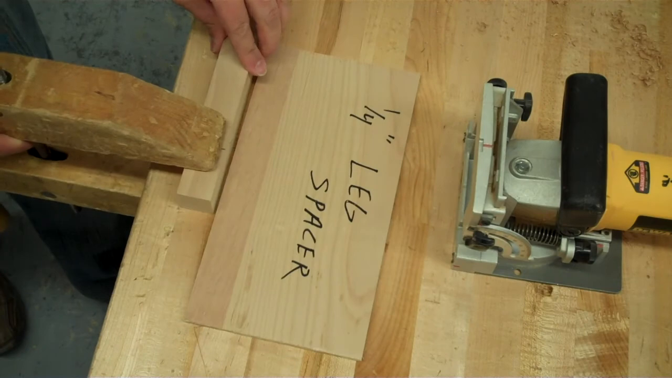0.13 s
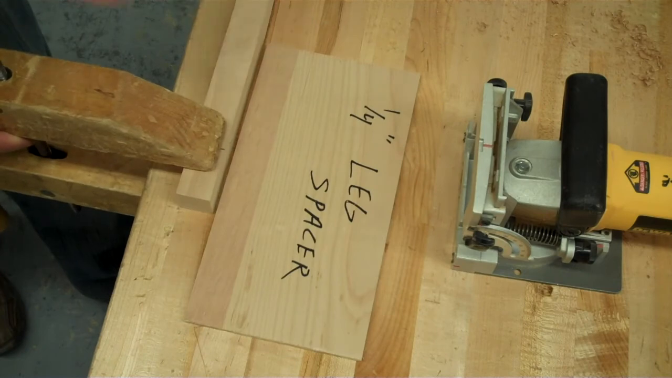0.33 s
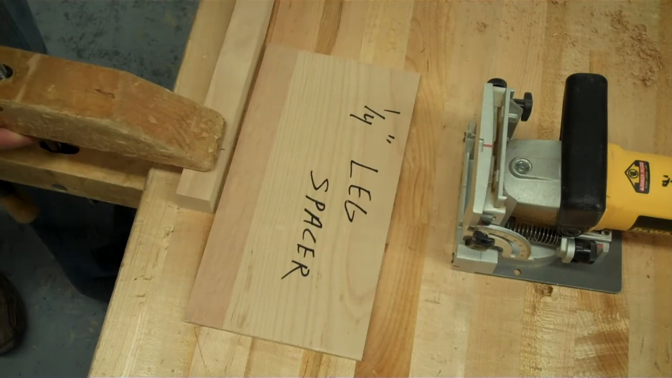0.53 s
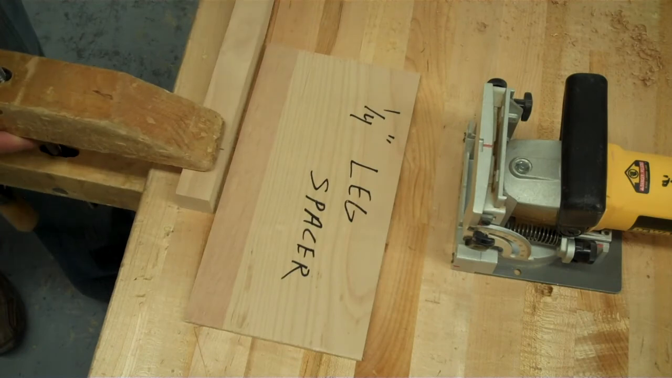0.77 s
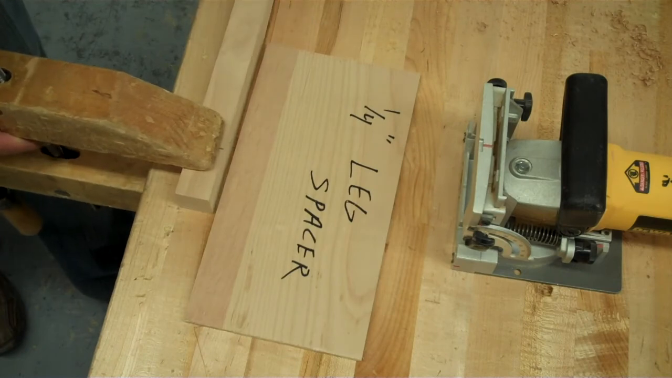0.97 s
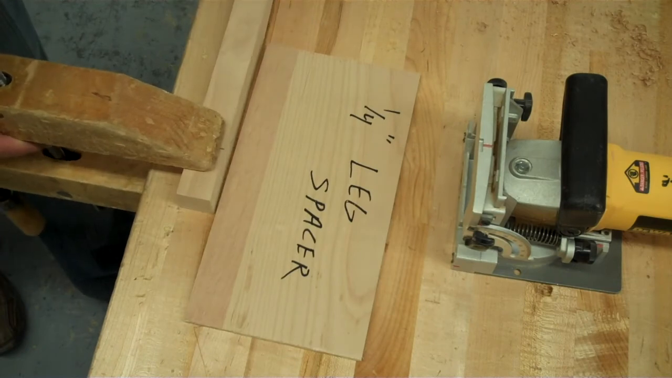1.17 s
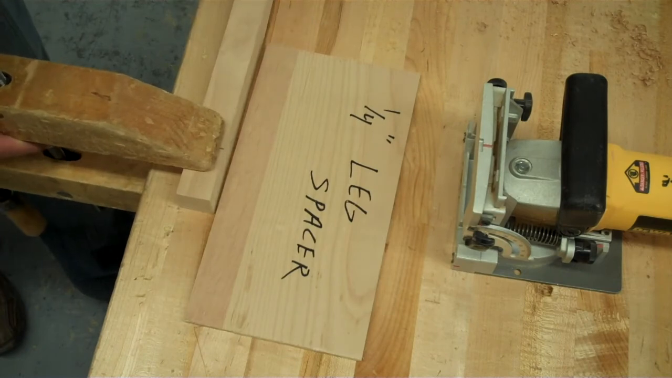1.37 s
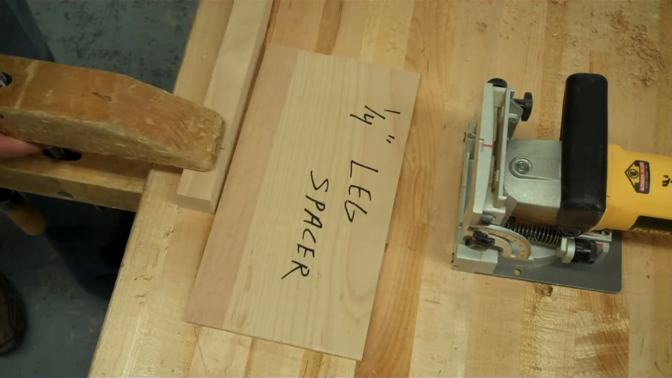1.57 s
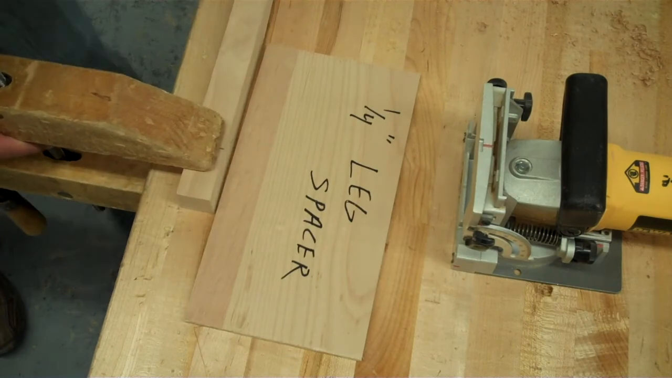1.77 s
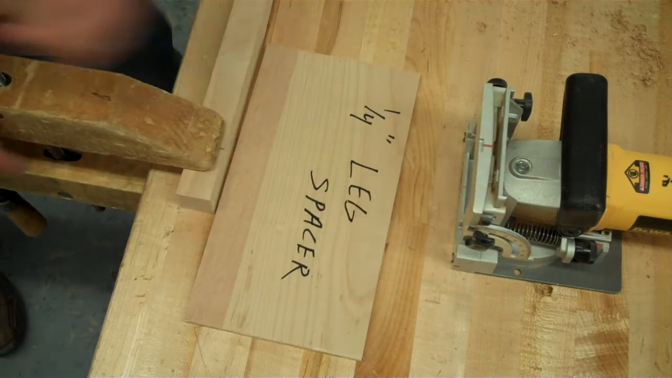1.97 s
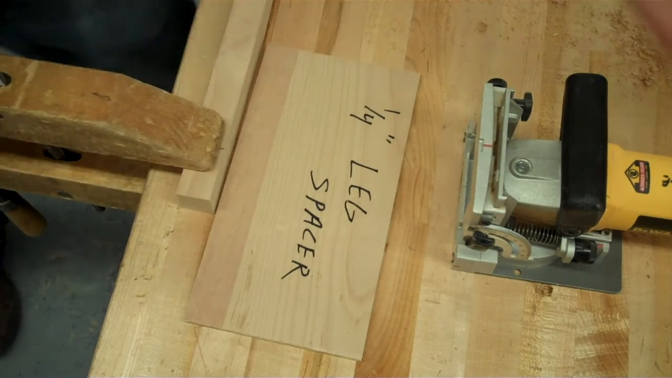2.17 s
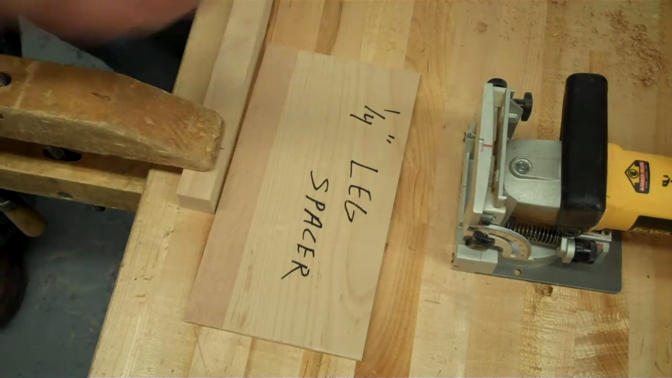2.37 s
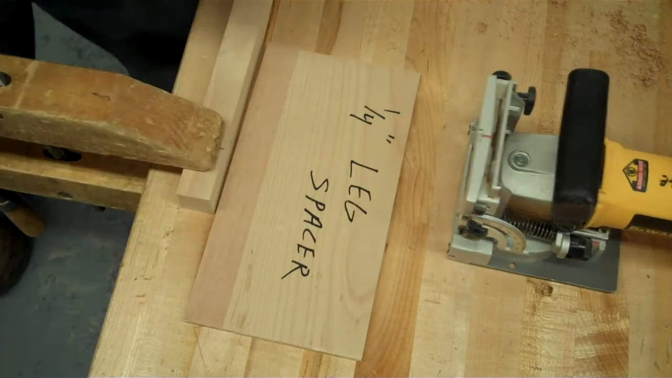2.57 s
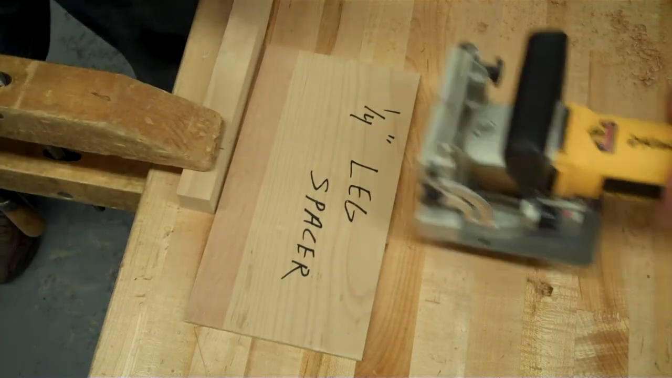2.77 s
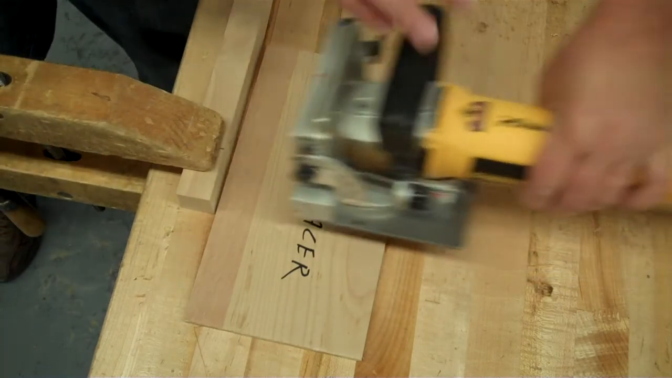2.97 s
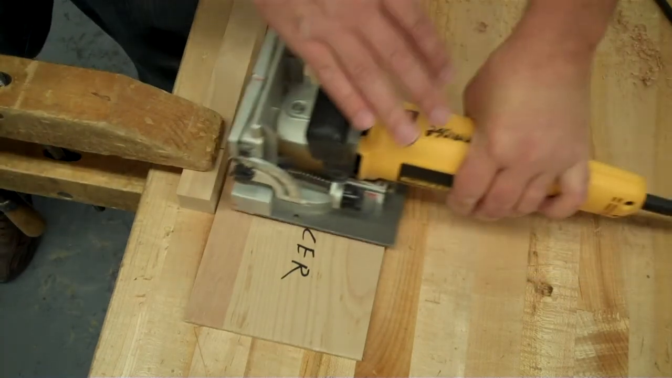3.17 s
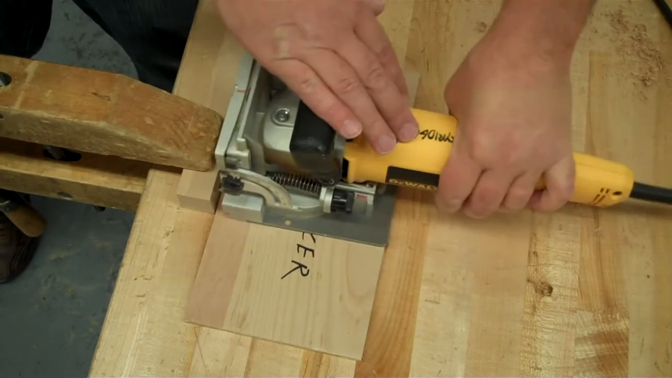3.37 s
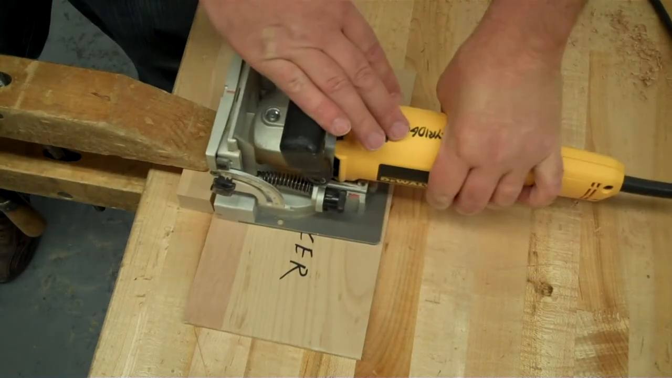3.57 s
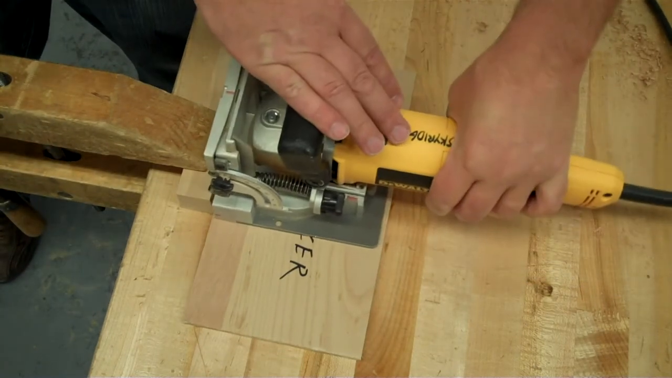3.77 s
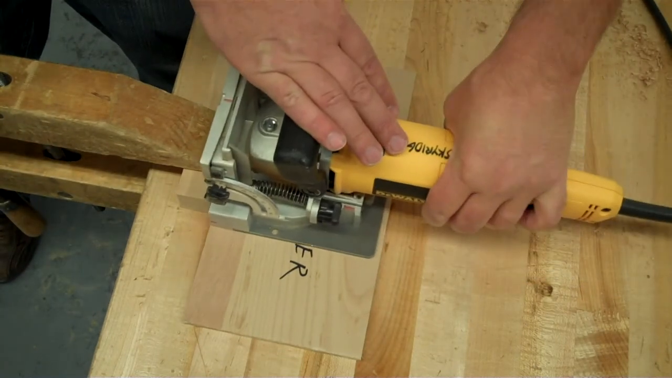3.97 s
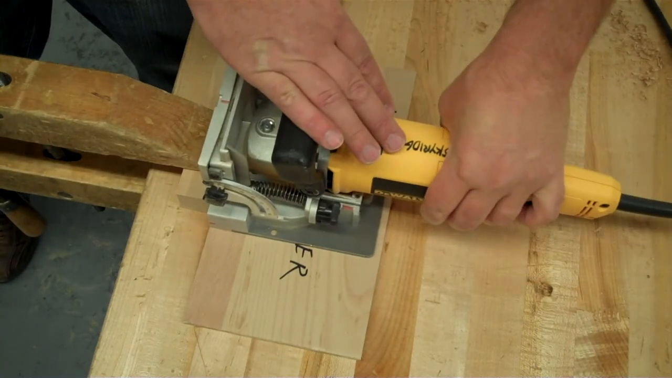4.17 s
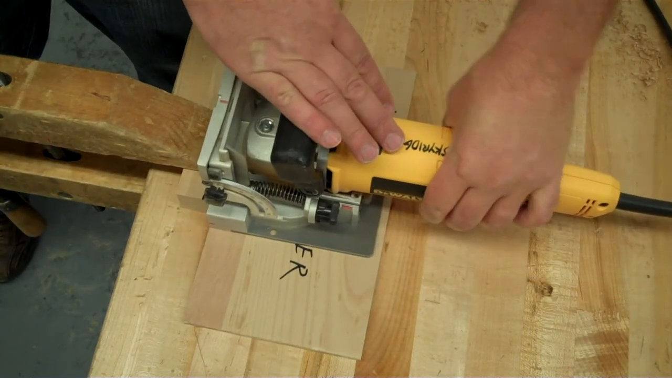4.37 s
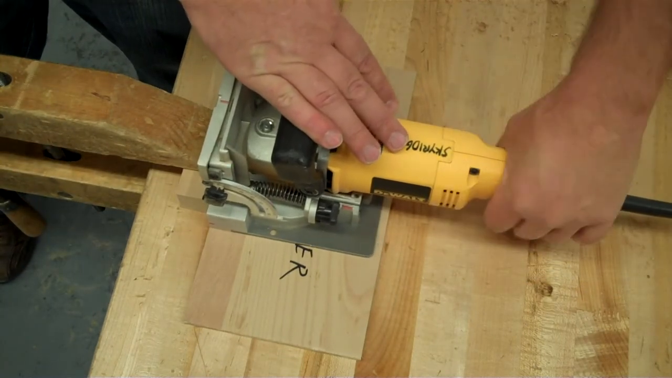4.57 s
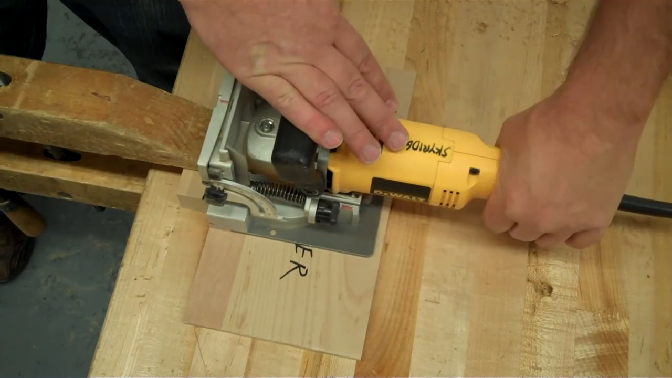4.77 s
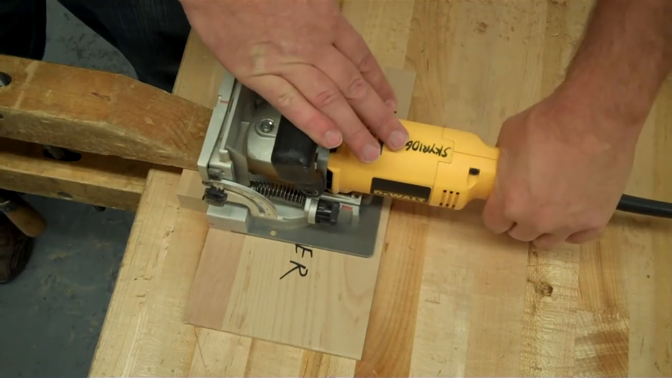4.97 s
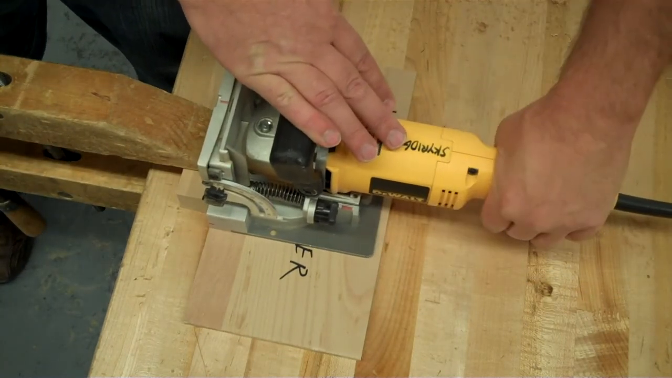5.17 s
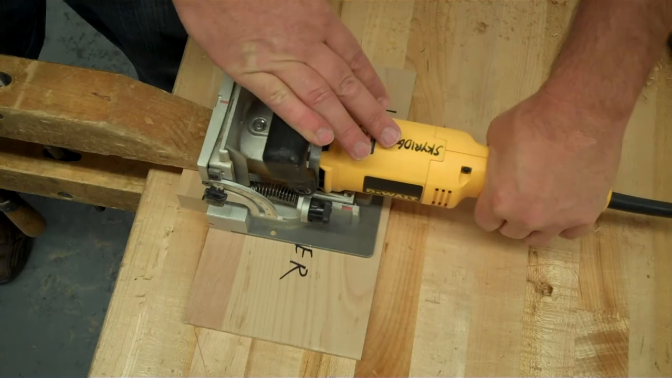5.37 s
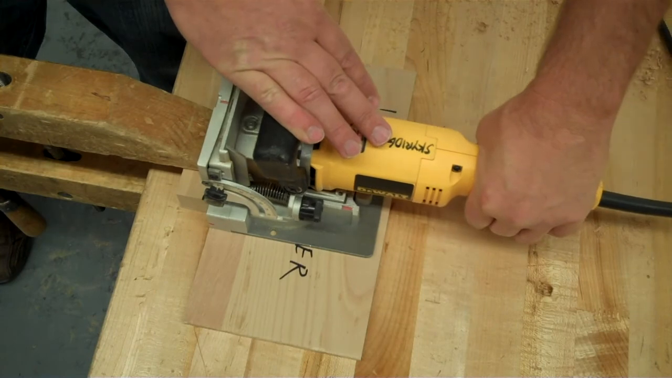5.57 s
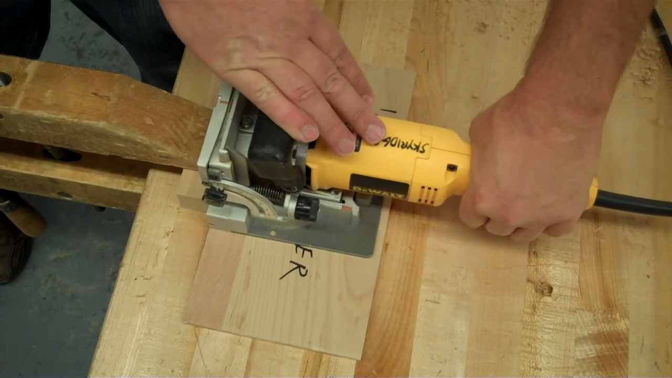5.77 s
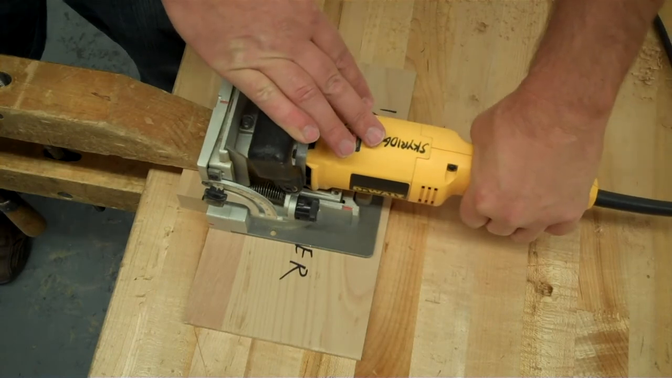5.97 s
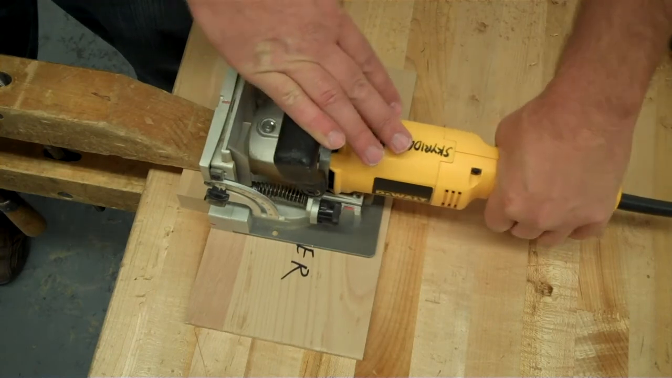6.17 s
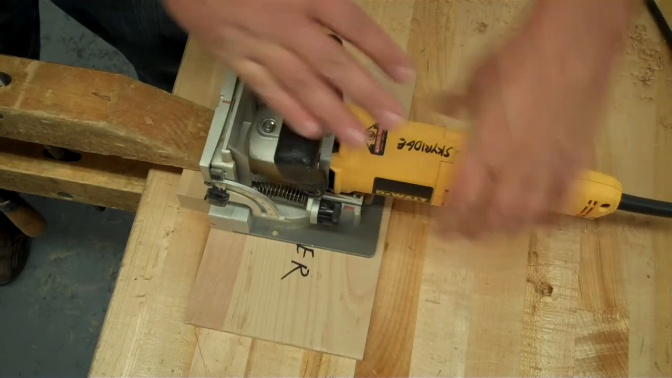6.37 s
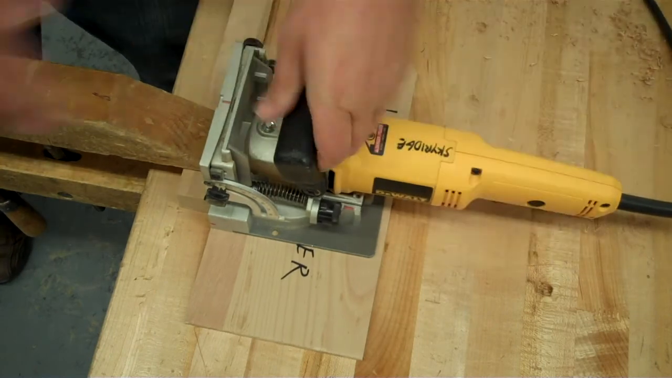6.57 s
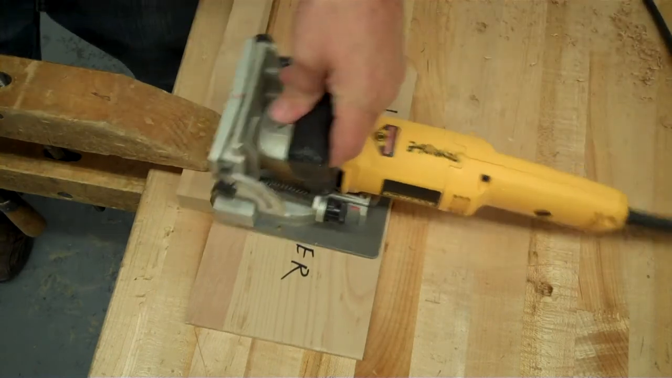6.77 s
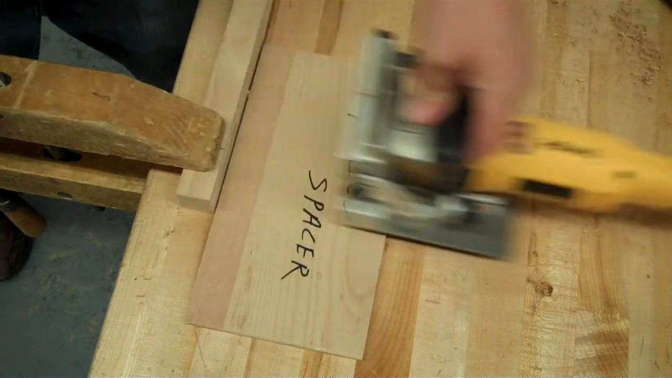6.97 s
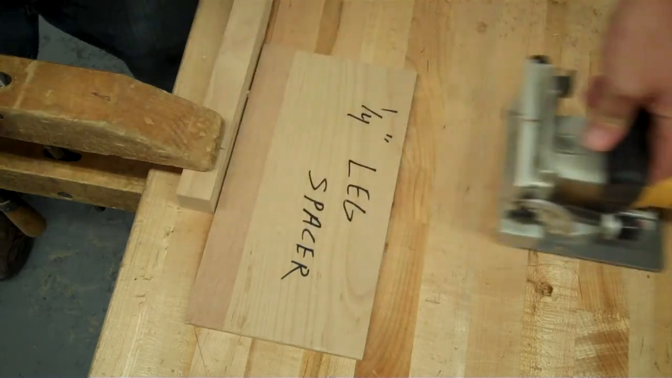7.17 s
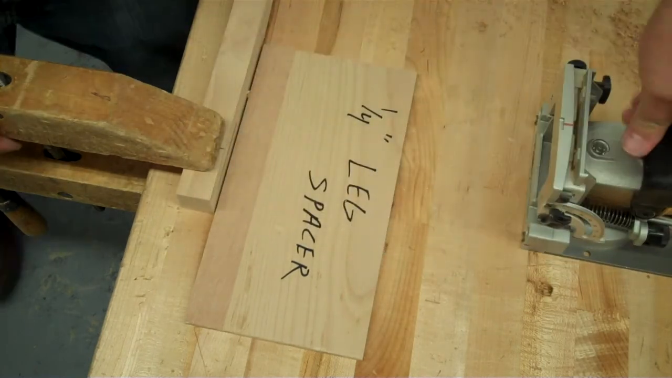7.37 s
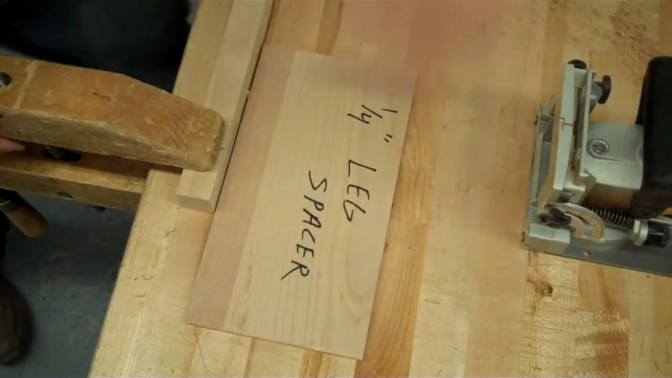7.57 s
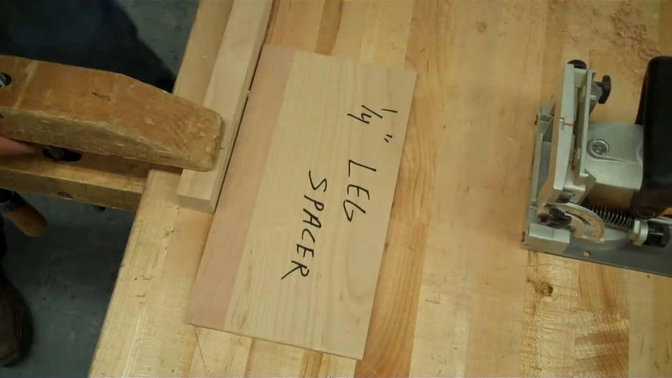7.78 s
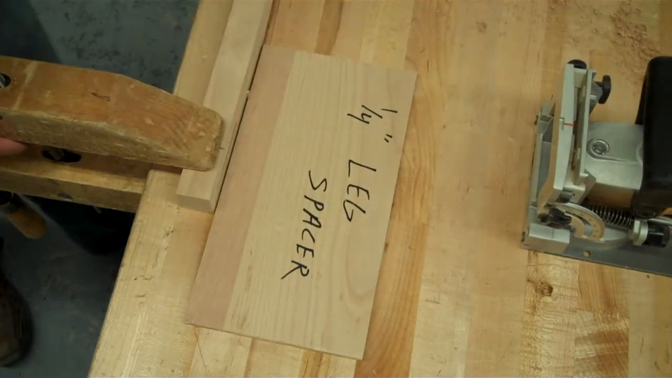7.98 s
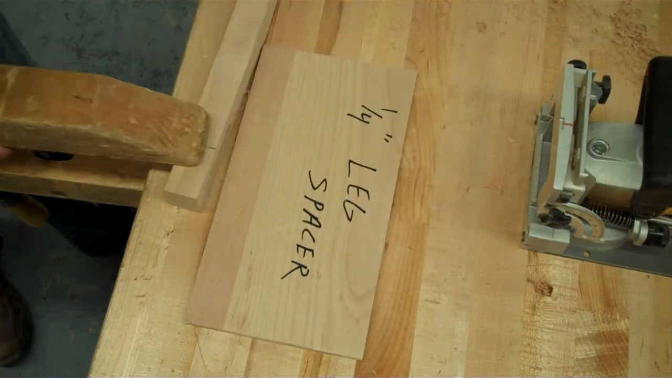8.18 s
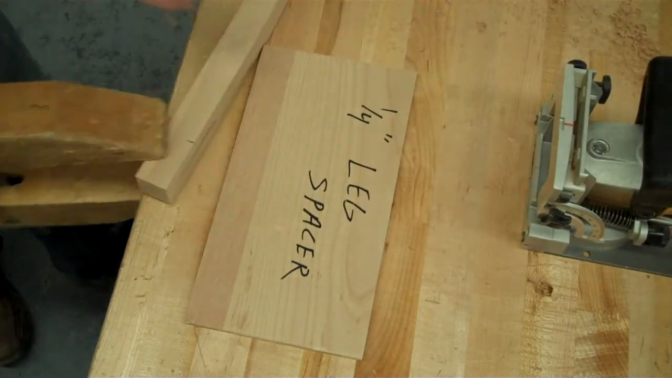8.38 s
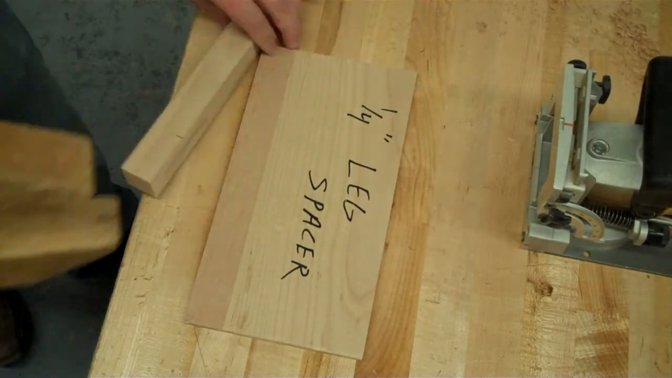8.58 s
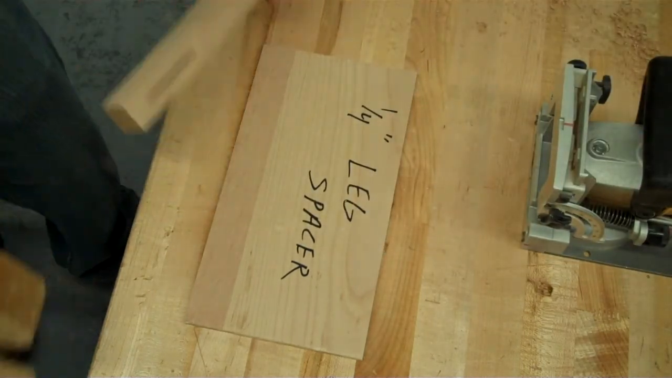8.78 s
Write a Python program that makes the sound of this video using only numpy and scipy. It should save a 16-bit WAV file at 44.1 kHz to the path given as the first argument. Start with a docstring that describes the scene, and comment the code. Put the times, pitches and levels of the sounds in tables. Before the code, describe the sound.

Quiet workshop hum with hand brushing and taps, then a loud slot cutter roars briefly into wood, spins down clattering and is set down.

```python
"""Hands and clamp rustle and knock on a workshop bench, then a small slot-cutting saw is switched on.
Its bevel gears whine up as tones locked to the gear train, over a roar of noise ringing case and bench;
the blade bites into hardwood and drags the speed down, the motor recovers, is switched off and coasts
while the slack gears clack to and fro as struck case modes. Filtered noise and thin tones make the
hum of fans and lamps in the room."""
import sys
import numpy as np
from scipy import signal
from scipy.fft import rfft, irfft, next_fast_len
from scipy.io import wavfile

SR = 44100
rng = np.random.default_rng(int(sys.argv[2]) if len(sys.argv) > 2 else 0)


def natural_amplitude(level_db):
    """Convert a level in decibels to a linear amplitude factor, elementwise."""
    exponent = np.asarray(level_db, float) / 20
    return 10 ** exponent


def log_audio(samples):
    """Write samples as a 16-bit WAV file to the path given in sys.argv[1]."""
    # one column per channel
    frames = np.atleast_2d(samples).T
    # limit to full scale, then quantise
    limited = np.clip(frames, -1, 1)
    pcm = np.round(limited * 32767).astype(np.int16)
    wavfile.write(sys.argv[1], SR, pcm)


N = 388942
TIME_S = np.arange(N) / SR

# the run of the gears: (time [s], gear mesh [Hz], load on the gear teeth [dB])
SPIN = [(4.94, 795, 0), (4.982, 1863, 3), (5.05, 3080, 2.5), (5.11, 3765, 5.5), (5.2, 4500, 3.5),
        (5.26, 4960, 3), (5.34, 5430, 2), (5.41, 5540, 1), (5.52, 5520, 0.5), (5.58, 5310, 0),
        (5.65, 4910, 2.5), (5.74, 4020, -1.5), (5.8, 4480, -1.5), (5.97, 5297, 1), (6.1, 5633, -1),
        (6.31, 6090, -3.5), (6.6, 5373, -2.5), (6.85, 4790, -3), (7.12, 4113, -4.5), (7.4, 3586, -11.5),
        (7.75, 2857, -20), (8.08, 2302, -22), (8.3, 2016, -27), (8.82, 1446, -73)]
# gear teeth slapping across their slack: (time [s], relative level [dB])
CLACKS = [(4.9367, 9), (4.9781, -2), (5.0214, -1), (5.0629, -2), (5.2284, -4), (5.3304, -2), (5.8974, -6),
          (6.6711, -5), (6.7415, -4), (6.7619, -6), (6.7918, -7), (6.8432, -7), (6.8692, -7), (6.8916, -7),
          (6.9245, -9), (6.95, -7), (6.9854, -7), (7.0034, -10), (7.0328, -9), (7.0572, -7), (7.0787, -9),
          (7.1565, -9), (7.1719, -9), (7.1983, -6), (7.2487, -9), (7.2716, -8), (7.2991, -4), (7.3235, -4),
          (7.341, -7), (7.3664, -5), (7.3849, -8), (7.4253, -9), (7.4398, -9), (7.4552, -7), (7.4737, -6),
          (7.4971, -7), (7.5241, -8), (7.552, -4), (7.5759, -10), (7.6049, -6), (7.6293, -8), (7.6583, -7),
          (7.6847, -7), (7.7136, -8), (7.7401, -7), (7.765, -9), (7.789, -7), (7.8154, -9), (7.8453, -7),
          (7.8588, -6), (7.8922, -12), (7.9222, -4), (7.9476, -7), (7.9785, -6), (8.0085, -11),
          (8.0379, -6), (8.0648, -12), (8.0868, -10), (8.1142, -7), (8.1377, -9), (8.1686, -15),
          (8.1686, -6), (8.198, -6), (8.2235, -7), (8.2524, -9), (8.2813, -10), (8.2998, -11),
          (8.3193, -11), (8.3467, -7), (8.3766, -5), (8.428, -8), (8.4584, -9), (8.4829, -9), (8.5033, -8),
          (8.5283, -8), (8.5542, -7), (8.5707, -10), (8.5871, -9), (8.6101, -9), (8.6305, -11),
          (8.6475, -11), (8.6635, -9), (8.6909, -5), (8.7188, -10), (8.7468, -10), (8.7732, -6),
          (8.7967, -9)]
# gear case resonances: (frequency [Hz], nominal width [Hz], relative level [dB])
CASE = [(570, 210, -22.5), (1100, 280, -7), (1587, 58, -11), (1985, 230, -13), (2365, 39, -20.5),
        (2900, 450, -13.5), (3125, 95, -4.5), (4700, 130, -13.5), (5490, 220, -12.5), (6070, 77, -2),
        (6200, 19.4, -5.5), (7413, 26, 1), (9580, 37, 2.5), (11460, 70, -14)]
# bench modes: (frequency [Hz], relative level [dB], time to fall 60 dB [s])
BENCH = [(74.4, -5, 0.092), (121.5, -24, 0.62), (200.5, 8, 0.098), (371, -4.5, 0.14), (544, 7, 0.043),
         (690, -2.5, 0.14), (940, 1, 0.052), (996, 3.5, 0.048), (1088, -2.5, 0.051), (1887, -15.5, 0.13),
         (2280, -2.5, 0.019), (2900, -13, 0.071), (3250, -12, 0.025)]
SWITCH_ON_S, SWITCH_OFF_S = 4.9368, 6.31
FULL_SPEED_HZ = 6000  # gear mesh that speed-dependent levels refer to
MAINS_PULSE_HZ = 120  # torque pulses, twice the mains frequency


def rms_one(x):
    """Scale to rms 1."""
    return x / np.sqrt(np.mean(x ** 2) + 1e-20)


def after(s, ramp_s):
    """Rises from 0 to 1 around a moment."""
    return np.clip((TIME_S - s) / ramp_s + .5, 0, 1)


def in_time(rows):
    """Columns joined by straight lines, and a gate that is open while the table lasts."""
    s, *columns = np.transpose(rows)
    gate = np.clip(np.minimum(TIME_S - s[0], s[-1] + 0.012 - TIME_S) / 0.00382, 0, 1)
    return [gate] + [np.interp(TIME_S, s, column) for column in columns]


def at_hz(points, hz):
    """A spectrum table read on a log-frequency axis."""
    table_hz, values = np.array(points).T
    return np.interp(np.log(hz + 1), np.log(table_hz), values)


def colour(x, spectrum):
    """Causal (minimum-phase) filter with the shape of the given spectrum and unit energy."""
    size = 2 ** 13
    cepstrum = irfft(np.log(natural_amplitude(at_hz(spectrum, np.fft.rfftfreq(size, 1 / SR)))))
    # folding the cepstrum onto positive time makes the filter minimum-phase
    cepstrum[1:size // 2] *= 2
    cepstrum[size // 2 + 1:] = 0
    pulse = irfft(np.exp(rfft(cepstrum)))
    pulse = pulse / np.sqrt(np.sum(pulse ** 2))
    return signal.oaconvolve(np.atleast_2d(x), pulse[None], axes=1)[:, :N]


def resonance(x, hz, width_hz):
    """Two-pole resonance, gain 1 on top."""
    r = np.exp(-np.pi * width_hz / SR)
    feedback = [1, -2 * r * np.cos(2 * np.pi * hz / SR), r * r]
    return signal.lfilter([(1 - r * r) / 2, 0, (r * r - 1) / 2], feedback, x + 1e-18)


def drift(rate):
    """Random wander: normal values of spread 1, rate of them a second, joined by straight lines."""
    knots = rng.standard_normal(N // 40)
    return np.interp(np.arange(N) * rate / SR, np.arange(len(knots)), knots)


def bursts(times, peaks, decay_s):
    """Envelope that swells within about a millisecond at each time and dies away."""
    marks = np.zeros(N)
    np.add.at(marks, np.minimum((np.asarray(times) * SR).astype(int), N - 1), peaks)
    swell = signal.lfilter([.03], [1, -.97], marks + 1e-18)
    return signal.lfilter([1], [1, -np.exp(-1 / (decay_s * SR))], swell)


def whine():
    """Tones locked to the gear train: mesh, octave, six blade teeth, blade wobble twice a turn, rotor."""
    # how the case radiates the mesh tone sweeping through it: (frequency [Hz], level [dB])
    mesh_response = [(800, -25), (1620, -28), (1870, -10.5), (2150, -30), (2450, -21), (2800, -15.5),
                     (3150, -16.5), (3370, -28), (3800, -20), (4100, -26), (4500, -26.5), (4780, -29.5),
                     (4990, -20.5), (5200, -19.5), (5450, -15.5), (5750, -9.5), (6090, -12)]
    # the same for the octave of the mesh: (frequency [Hz], level [dB])
    octave_response = [(1600, -58), (4300, -30), (4700, -21.5), (5300, -23.5), (5800, -37), (6400, -29),
                       (7000, -29), (7600, -23), (8200, -17.5), (8900, -23), (9300, -28), (9900, -20.5),
                       (10500, -29), (11000, -33), (11500, -37), (12200, -24)]
    # the teeth part for a moment, rebounding from the start and later as blade and rotor coast level:
    # (time [s], half-width of the dip [s], change of mesh level [dB])
    floats = [(5.03, .045, -14), (7.08, .2, -14)]
    # overtones of the blade-tooth tone, first to fourth partial: (relative level [dB])
    tooth_overtones_db = [0, -3, -7, -12]
    crown_teeth, pinion_teeth, blade_teeth = 42, 13, 6
    cut_ends_s = 5.95  # until then the gears work under starting and cutting load

    gate, mesh_hz, load_db = in_time(SPIN)
    octaves = np.log2(mesh_hz / FULL_SPEED_HZ)
    mesh_db = at_hz(mesh_response, mesh_hz) + 0.63 * load_db
    for s, lasts, db in floats:
        mesh_db += db * np.exp(-((TIME_S - s) / lasts) ** 2)
    octave_db = at_hz(octave_response, 2 * mesh_hz) + 0.73 * load_db
    # while coasting, each slap presses the teeth together
    slaps = [s for s, db in CLACKS if s > SWITCH_OFF_S]
    pressed = 1 + 1.5 * bursts(slaps, np.ones(len(slaps)), decay_s=.008) / 30

    # the blade enters the wood, bites, and leaves it
    entered, left = after(5.5, 0.16), after(6.12, 0.14)
    bite = np.exp(-((TIME_S - 5.64) / 0.077) ** 2)
    # the blade teeth are muffled until the blade has cleared its slot
    teeth_db = -34 + 14.5 * octaves - 11 * (1 - left)
    wobble_db = -62 + 23 * (entered - left)
    rotor_db = -53 + 7 * octaves + 21 * bite

    turn = 2 * np.pi * np.cumsum(mesh_hz * gate / crown_teeth) / SR
    rotor = turn * crown_teeth / pinion_teeth
    mesh = crown_teeth * turn
    # shaft twist blurs the mesh, most under load
    loaded = np.arange(N) < cut_ends_s * SR
    jitter = .3 * drift(300.) + .3 * loaded * np.sin(rotor)
    # under load the octave dissolves into a band of hiss
    octave_blur = np.where(loaded, 2.2, .4) * drift(900.)
    # eccentric gears press harder once a turn
    runout = 1 + .25 * np.sin(rotor) + .2 * np.sin(turn)

    out = natural_amplitude(mesh_db + 1.7 * drift(150.)) * runout * pressed * np.sin(mesh + jitter)
    # under power a companion line runs one rotor turn below the mesh
    below_db = mesh_db - 13 + 3 * drift(60.)
    powered = 1 - after(SWITCH_OFF_S + .1, .3)
    out += natural_amplitude(below_db) * powered * np.sin(mesh - rotor + 3 * jitter)
    out += natural_amplitude(octave_db + 3 * drift(120.)) * pressed * np.sin(2 * mesh + octave_blur)
    for k, db in enumerate(tooth_overtones_db):
        tooth_level = natural_amplitude(teeth_db + db + 3 * drift(25.))
        tooth_phase = blade_teeth * turn + 1.2 * drift(30.)
        out += tooth_level * np.sin((k + 1) * tooth_phase)
    out += natural_amplitude(wobble_db + 0.83 * drift(15.)) * np.sin(2 * turn)
    out += natural_amplitude(rotor_db + 2.0 * drift(10.0)) * np.sin(rotor)
    return np.sqrt(2) * gate * out


def roar():
    """Air rush and dense tiny impacts ring gear case and bench; two draws: direct and scattered part."""
    # bench rumble, cooling air, gear case, bearing sizzle, topmost hiss: (level at full speed [dB],
    # slope [dB per octave of speed], share of the tooth load [dB per dB], added under power [dB])
    layers = [(-45, -2, .01, 11), (-22, 3, 0.13, -1.5), (-17, 1.3, 0.95, -0.3), (-26, 4.5, 0.14, 4.3),
              (-29.5, -1.5, 1.15, -0.7)]
    # borders between those layers: (frequency [Hz])
    edges_hz = [450, 3500, 7200, 10500]
    # spectrum before the layers are levelled: (frequency [Hz], relative density [dB per Hz])
    spectrum = [(24, -54), (40, -56.5), (434, -6), (543, -3.5), (768, 0.5), (1040, -1), (1500, -5.5),
                (2870, -5), (3960, -8), (6340, -4.5), (7740, 3.5), (8760, 3.5), (12100, -13), (14000, -6.5),
                (15100, -81)]
    chatter_db = 0  # swing of the gear case layer on every second blade turn; 0 leaves it steady

    gate, mesh_hz, load_db = in_time(SPIN)
    octaves = np.log2(mesh_hz / FULL_SPEED_HZ)
    powered = 1 - after(SWITCH_OFF_S, 0.45)
    levels_db = [db + slope * octaves + share * load_db + extra * powered
                 for db, slope, share, extra in layers]
    half_turn = np.pi * np.cumsum(mesh_hz / 42) / SR + 1.5 * drift(12.)  # 42 crown teeth
    levels_db[2] += chatter_db * (after(6.26, 0.36) - after(5.7, .2)) * np.cos(half_turn)
    # torque ripple, deepest just after switch-on
    since = TIME_S - SWITCH_ON_S
    ripple_db = (2 + 6 * np.exp(-np.maximum(since, 0) / .15)) * powered
    ripple = natural_amplitude(ripple_db * np.cos(2 * np.pi * MAINS_PULSE_HZ * since - 1.1))
    # some 600 impacts a second roughen the noise
    grit = (rng.random(N) < 600. / SR) * natural_amplitude(0.7 * np.minimum(rng.exponential(1, N), 4))
    roughness = 1 + .5 * signal.lfilter([1], [1, -.96], grit)
    drive = rng.standard_normal((2, N)) * roughness * ripple

    case = sum(natural_amplitude(.5 * db) * resonance(drive, hz, 3.9 * width) for hz, width, db in CASE)
    bench = sum(resonance(drive, hz, 1.06 / t60) for hz, db, t60 in BENCH if hz < 600)
    rung = colour(drive + natural_amplitude(2.5) * case + natural_amplitude(4.5) * bench, spectrum)
    below = [signal.sosfiltfilt(signal.butter(3, hz, fs=SR, output="sos"), rung) for hz in edges_hz]
    parts = np.diff([0 * rung] + below + [rung], axis=0)
    levelled = [rms_one(part) * natural_amplitude(db + 0.68 * drift(30.)) for part, db in zip(parts, levels_db)]
    return gate * sum(levelled)


def clacks():
    """Each slap and its rebound crack and strike every case mode with a strength of its own."""
    # spectrum of the crack: (frequency [Hz], relative density [dB per Hz])
    crack_spectrum = [(120, -79.5), (200, -0.5), (420, -43), (1060, -1.5), (1460, -2.5), (2810, 2.5),
                      (4110, -3.5), (7610, 11.5), (8790, 1), (12200, -32.5), (15100, -22)]
    # 20 weaker slaps at random moments of the start, -19 to -9 dB
    stray = rng.random((20, 2))
    strays = [SWITCH_ON_S, -19] + stray * [5.6 - SWITCH_ON_S, 10]
    s, peak_db = np.concatenate([CLACKS, strays]).T
    luck = rng.standard_normal((len(s), len(CASE) + 3))
    # slaps of slow coasting gears reach the lower case modes
    mesh_hz = np.interp(s, *np.transpose(SPIN)[:2])
    slow = np.clip((1960 - mesh_hz) / 400 + .5, 0, 1) * (s > SWITCH_OFF_S)
    lower_db = -10.5 + 7 * slow + 2 * luck[:, -3]
    # the rebound follows after typically 5 ms
    times = np.concatenate([s, s + 0.00506 * natural_amplitude(5.45 * luck[:, -1])])
    rebound_db = -8 + 3 * luck[:, -2]

    noise = rng.standard_normal(N)
    crack_strengths = natural_amplitude(np.concatenate([peak_db, peak_db + rebound_db]))
    out = colour(noise * bursts(times, crack_strengths, decay_s=.0025), crack_spectrum)[0]
    hits = np.minimum(((times + .0005) * SR).astype(int), N - 1)
    for k, (hz, width, db) in enumerate(CASE):
        own_db = peak_db + 17 + db + 1.5 * luck[:, k] + lower_db * (hz < 3800)
        strengths = natural_amplitude(np.concatenate([own_db, own_db + rebound_db]))
        # a puff of noise with a sharp click in it
        blows = .4 * noise * bursts(times, strengths, decay_s=0.00091)
        np.add.at(blows, hits, 4 * strengths)
        out += resonance(blows, hz, 1.1 * width)
    return out


def mains_buzz():
    """Starting current shakes the field iron at twice the mains frequency and its octave, fading quickly."""
    since = TIME_S - SWITCH_ON_S
    # falls 124 dB a second to a resting level
    level = natural_amplitude(np.maximum(-30 - 124 * np.abs(since), -55))
    phase = 2 * np.pi * MAINS_PULSE_HZ * TIME_S
    gate = after(SWITCH_ON_S + 0.0051, .004) - after(5.5, .02)
    return np.sqrt(2) * gate * level * (np.sin(phase) + 0.15 * np.sin(2 * phase))


def slide():
    """The base scuffs to rest: friction noise rings one broad bench resonance and dies away."""
    start_s, fade_s = 7.19, .16
    since = np.maximum(TIME_S - start_s, 0)
    friction = rng.standard_normal(N) * natural_amplitude(2.4 * drift(40.))
    rub = rms_one(resonance(friction, hz=1100, width_hz=220))
    return natural_amplitude(-26) * after(start_s, .01) * np.exp(-since / fade_s) * rub


def knocks():
    """A short crack around its own pitch, and the bench modes: the low ones follow the thud."""
    # wood and tool touching the bench:
    # (time [s], relative level [dB], centre of the crack [Hz], thud against the crack [dB])
    touches = [(0.406, -43.5, 1870, -5), (0.516, -37, 1960, -16), (0.604, -44, 2410, -3),
               (0.972, -35, 1100, -12), (1.061, -31, 1180, -10.5), (1.323, -43, 7820, -16),
               (1.744, -28, 2150, -22), (1.854, -32, 4260, -26), (2.591, -22.5, 1110, -14),
               (2.596, -15.5, 2630, -12), (2.675, -30, 1110, -7.5), (3.219, -21, 1190, -38),
               (3.501, -43, 1260, -22), (3.815, -35.5, 8800, -31), (4.138, -24.5, 5700, -36),
               (4.339, -43, 1920, -2), (4.934, -4, 1130, -31.5), (7.189, -5, 1040, -18.5),
               (7.3, -9, 1120, -27)]
    out, t = np.zeros(N + SR), np.arange(SR // 2) / SR
    for s, peak_db, crack_hz, thud_db in touches:
        puff = rng.standard_normal(len(t)) * np.exp(-t / 0.0034)
        blow = 0.035 * np.diff(puff, prepend=0) + 3.6 * resonance(puff, crack_hz, 0.53 * crack_hz)
        for hz, db, t60 in BENCH:
            # higher modes sound the more, the nearer they lie to the crack
            near_db = thud_db if hz < 1000 else -2.5 * abs(np.log2(hz / crack_hz)) - 3
            mode_level = natural_amplitude(db + near_db + rng.normal(0, 4.34) - 60 * t / t60)
            blow += mode_level * np.sin(2 * np.pi * hz * t) * np.minimum(t * hz, 1)
        out[round(s * SR):][:len(t)] += natural_amplitude(peak_db - 4.0) * blow
    return out[:N]


def strokes():
    """Level of the loudest brushing (quick rise, hold, slower fall) and the power-weighted centre of all."""
    # sleeves and palms brushing wood: (start [s], held [s], level [dB], centre [Hz])
    brushings = [(.2, 0.0089, -63, 6600), (.42, .17, -57.5, 7200), (.74, .02, -61, 6200),
                 (.86, .03, -60, 7400), (.97, 0.079, -55, 6200), (1.33, 0.014, -51, 7700),
                 (1.745, 0.0043, -56, 5130), (1.86, 0.036, -55, 4500), (1.92, 0.051, -49, 6900),
                 (2.17, 0.14, -48, 4700), (2.41, 0.097, -40.5, 6500), (2.605, 0.006, -45, 4300),
                 (2.67, .25, -52.5, 6800), (2.97, 0.073, -46, 7300), (3.16, 0.06, -46.5, 7250),
                 (3.22, 0.013, -43.5, 4640), (3.39, 0.083, -49.5, 6640), (3.84, 0.16, -49, 7350),
                 (4.135, 0.01, -50, 6000), (4.5, 0.1, -49, 6160), (4.83, 0.015, -57, 6100)]
    s, held, db, hz = np.transpose(brushings)[:, :, None]
    t = np.arange(0, N, 64) / SR
    # rises 300 and falls 179 dB a second
    each = db - 300 * np.maximum(s - t, 0) - 179 * np.maximum(t - s - held, 0)
    power = natural_amplitude(2 * np.maximum(each, -150))
    level_db = np.maximum(each.max(axis=0), -77)
    centre_hz = (power * hz).sum(axis=0) / power.sum(axis=0)
    return in_time(np.transpose([t, level_db, centre_hz]))[1:]


def rustle():
    """Crackly friction noise in bands weighted around a wandering centre, until switch-on; two draws."""
    level_db, centre_hz = strokes()
    out = 0
    for hz in np.geomspace(1800, 10500, 8):
        crackle = rng.standard_normal((2, N)) * natural_amplitude(4.0 * drift(210.0))
        share = np.exp(-(np.log2(hz / centre_hz) / .45) ** 2) + .1
        band = resonance(resonance(crackle, hz, hz / 2), hz, hz / 2)
        out = out + share * rms_one(band)
    return (1 - after(SWITCH_ON_S, .01)) * natural_amplitude(level_db) * out


def shop_air():
    """Broad ventilation noise (two draws) with fan resonances and thin lamp tones."""
    # ventilation spectrum: (frequency [Hz], relative density [dB per Hz])
    air_spectrum = [(15, -52), (25, -18.5), (187, -1.5), (272, -5.5), (346, -5.5), (560, -7.5), (883, -11),
                    (957, -16.5), (1040, -14.5), (1730, -17.5), (5320, -23), (8170, -13.5), (9590, -25.5),
                    (13600, -25), (15100, -89)]
    # fan resonances: (frequency [Hz], width [Hz], level [dB])
    fan_hum = [(198.3, 11.6, -56), (248, 17, -82), (346.3, 13.7, -58)]
    # lamp tones: (frequency [Hz], level [dB])
    lamp_tones = [(119.4, -60.5), (958.2, -64.5), (11795, -77)]
    out = natural_amplitude(-48.5) * colour(rng.standard_normal((2, N)), air_spectrum)
    for hz, width, db in fan_hum:
        out += natural_amplitude(db) * rms_one(resonance(rng.standard_normal((2, N)), hz, width))
    for hz, db in lamp_tones:
        out += np.sqrt(2) * natural_amplitude(db + 2.3 * drift(3.13)) * np.sin(2 * np.pi * hz * TIME_S)
    return out


def walls(x):
    """Reverberation: decaying noise after a short gap, duller than the direct sound, two draws."""
    t60_s, gap_s = .45, .004
    t = np.arange(SR // 2) / SR
    tails = rng.standard_normal((2, len(t))) * natural_amplitude(-60 * t / t60_s) * (t > gap_s)
    tails = signal.lfilter([1], [1, -.5], tails)
    tails = tails / np.sqrt(np.sum(tails[0] ** 2))
    return natural_amplitude(-10) * signal.oaconvolve(x[None], tails, axes=1)[:, :N]


def scattered(x, smear_s):
    """The sound itself, and a copy smeared by reflections off bench and hands."""
    t = np.arange(1024) / SR
    smear = rng.standard_normal(len(t)) * np.exp(-t / smear_s)
    smear = smear / np.sqrt(np.sum(smear ** 2))
    return np.array([x, signal.oaconvolve(x, smear)[:N]])


def two_ports(pair, likeness, balance, phase):
    """Left and right share most of the bass; above, the second part enters in opposition, right muffled."""
    size = next_fast_len(N + 2048)
    hz = np.fft.rfftfreq(size, 1 / SR)
    direct, other = rfft(pair, size)
    alike = np.clip(at_hz(likeness, hz), 0, 1)
    ports = np.sqrt((1 + alike) / 2) * direct + np.sqrt((1 - alike) / 2) * other * [[1], [-1]]
    level = natural_amplitude(at_hz(balance, hz) * [[0], [-1]])
    # each side takes half of the phase lead
    turned = np.exp(.5j * np.interp(hz, *np.transpose(phase)) * [[1], [-1]])
    return irfft(ports * level * turned, size)[:, :N]


def scene():
    """Machine and bench close to the microphones, the shop around them."""
    # left-right likeness, nearby and in the room: (frequency [Hz], likeness [-1 to 1])
    near_likeness, air_likeness = [(60, 0.84), (110, 0.93), (200, 0.93), (380, 0.97), (690, 1), (1270, 1),
                                   (2350, 1), (4320, 0.61), (7970, 0.086), (14700, -0.0)], [(60, 0.78), (180, 0.98), (540, 0.94),
                                                          (1630, 0.71), (4890, 0.24), (14700, -0.72)]
    # balance, nearby and in the room: (frequency [Hz], left over right [dB])
    near_balance, air_balance = [(60, -1), (250, -1.5), (1000, 0), (3500, .5), (5600, -1.5), (6600, 0),
                                 (7600, 8), (9100, 14), (11600, 15), (14700, 20)], [(60, -3.5), (240, -0.5), (940, 0), (3710, 0.5),
                                                       (14700, 10)]
    # phase, nearby and in the room: (frequency [Hz], lead of the left [radians])
    near_phase, air_phase = [(0, 0), (2840, -0.14), (4480, -0.5), (6290, 0.041), (7410, -0.56),
                             (9650, -0.82), (14000, -1.3)], [(0, 0), (2840, 0.95), (4130, 1.3), (4650, 0.6), (6890, 4),
                                                 (8100, 2.7), (8700, 0.5), (11800, 1.4), (14000, 0.6),
                                                 (14800, -3.4)]
    gears = clacks()
    wood = knocks() + slide()
    near = scattered(gears + wood, smear_s=.004) + roar() + walls(gears + wood / 2)
    near[0] += whine() + mains_buzz()
    room = two_ports(shop_air() + rustle(), air_likeness, air_balance, air_phase)
    return two_ports(near, near_likeness, near_balance, near_phase) + room


def low_pass(x):
    """Removes everything above the highest recorded frequency."""
    return signal.sosfilt(signal.butter(12, 15280, fs=SR, output="sos"), x)


def record(dry):
    """The loudest peaks are rounded off, the top is cut."""
    rounded = 0.94 * np.tanh(dry / 1.128)
    top_cut = signal.cheby2(10, 50, 15400, fs=SR, output="sos")  # 50 dB down from 15400 Hz
    mix = signal.sosfilt(top_cut, rounded)
    return low_pass(mix)


dry = scene()
out = record(dry)
log_audio(out)
```